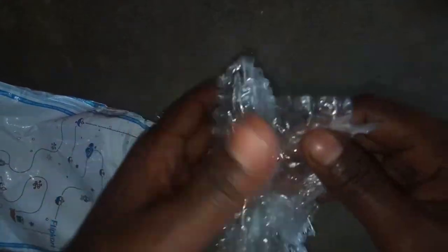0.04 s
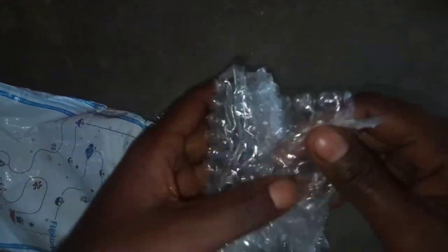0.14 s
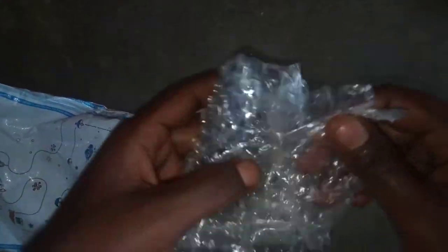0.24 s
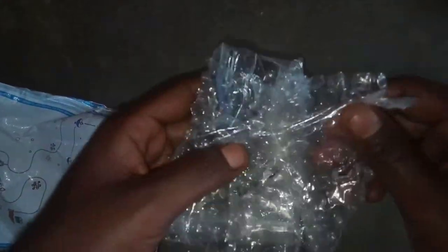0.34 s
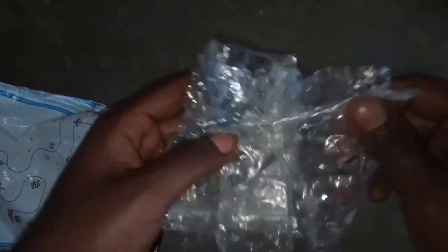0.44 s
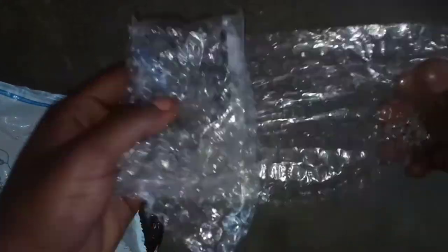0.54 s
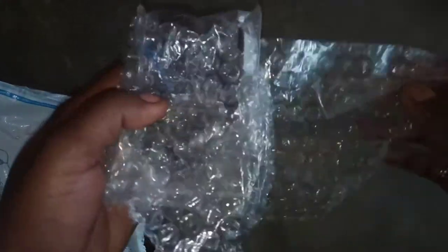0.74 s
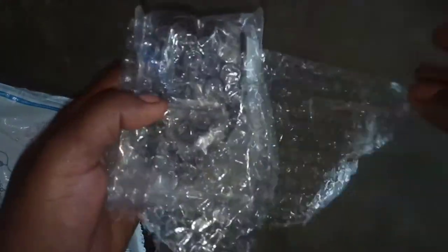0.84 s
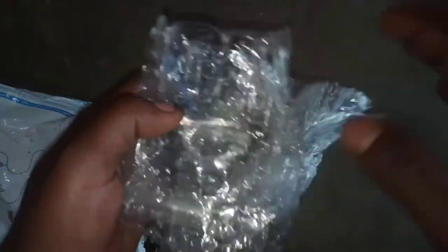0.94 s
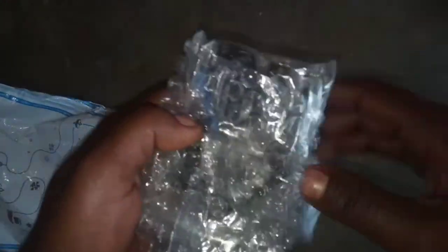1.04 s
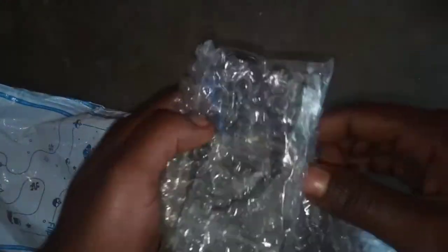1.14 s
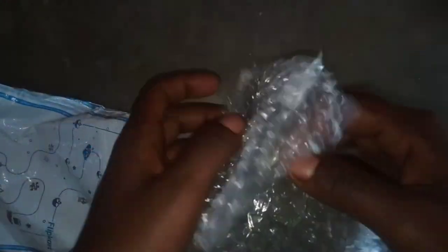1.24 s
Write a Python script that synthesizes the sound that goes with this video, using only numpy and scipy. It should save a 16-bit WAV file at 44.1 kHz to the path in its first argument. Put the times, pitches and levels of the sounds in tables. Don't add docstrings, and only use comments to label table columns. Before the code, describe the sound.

Hands unwrap crinkly plastic film indoors, heard very near. Fine crackle and separate snaps swell into a quick peeling crackle with a dull thud, then fade to sparse, quiet gripping ticks with a short room tail.

```python
import sys
import numpy as np
from scipy import signal
from scipy.io import wavfile
from scipy.ndimage import uniform_filter1d

SR = 44100
rng = np.random.default_rng(int(sys.argv[2]) if len(sys.argv) > 2 else 0)


def waveform_to_disk(signal):
    frames = np.transpose(np.atleast_2d(signal))
    scaled = np.clip(frames, -1, 1) * 32767
    samples = np.round(scaled).astype(np.int16)
    wavfile.write(sys.argv[1], SR, samples)


def to_linear_factor(level_db):
    exponent = np.asarray(level_db, float) / 20
    return 10 ** exponent


N = 57330


def evened(x):
    return x / np.sqrt(np.mean(x ** 2) + 1e-20)


def read(points, hz):
    f, value = np.transpose(points)
    return np.interp(np.log(hz + 1), np.log(f + 1), value)


def colour(x, points):
    log_gain = np.log(to_linear_factor(read(points, abs(np.fft.fftfreq(4096, 1 / SR)))))
    response = np.exp(log_gain - 1j * signal.hilbert(log_gain).imag)
    return signal.oaconvolve(x, np.fft.ifft(response).real[:2048])[:len(x)]


def ring(x, hz, width_hz):
    t = np.arange(700) / SR
    fade = t * np.exp(-np.pi * width_hz * t * 1.6)
    y = np.convolve(x, fade * np.sin(2 * np.pi * hz * t))[:700]
    return y / abs(y).max()


def snap(low_db, low_hz, high_db, high_hz, chance):
    # pitch in Hz, width in Hz, level in dB.
    film_rings = [(3500, 600, -7), (4800, 600, -9), (6200, 600, -8)]
    snap_ms, big_snap_db = 0.4, -19
    u = np.arange(120) / (snap_ms * SR / 1000)
    push = chance[:120] * to_linear_factor(6.6 * chance[120:240]) * u * np.exp(-2 * u)

    belly_db = -4 + 1.3 * min(low_db - big_snap_db, 0)
    belly = to_linear_factor(belly_db) * ring(abs(push), 670, 230)
    low = ring(abs(push), low_hz, 320) - belly

    high = ring(push, high_hz, 520)
    high = high + sum(to_linear_factor(db) * ring(push, hz, width_hz) for hz, width_hz, db in film_rings)
    high = high + to_linear_factor(-2) * ring(chance[:3], 4900, 2600)
    return to_linear_factor(-2) * (to_linear_factor(low_db) * low + to_linear_factor(high_db) * high)


def snaps():
    # time in seconds, low ring peak in dB, low ring in Hz, high ring peak in dB, high ring in Hz.
    turning = [(0.0137, -42.5, 1480, -50, 3820), (0.1187, -52.5, 1900, -59, 3400),
               (0.16, -51, 1620, -52.5, 4380), (0.2089, -46.5, 1600, -47, 3730),
               (0.2197, -42.5, 1500, -43.5, 5200), (0.2486, -21.5, 1510, -29.5, 3320),
               (0.2512, -35.5, 2050, -55, 3500), (0.2359, -51, 1500, -39, 5360),
               (0.2616, -60, 1260, -31.5, 5600), (0.2656, -36, 1570, -41, 5600),
               (0.2737, -34, 1620, -42, 3570), (0.3111, -26.5, 1580, -33.5, 3420),
               (0.3212, -41, 1320, -41, 2970), (0.323, -31, 1640, -46, 4200),
               (0.3246, -48, 1630, -45, 5900), (0.329, -56, 2160.0, -37, 3740.0),
               (0.3308, -61, 1840, -40, 3440), (0.3422, -50, 1400, -42, 3650),
               (0.3499, -33.5, 1500, -37, 3660), (0.3527, -33, 1620, -43, 2818),
               (0.3614, -27.5, 1560, -30.5, 3700), (0.3701, -25, 1626, -32, 3500),
               (0.3735, -38, 1730, -34.5, 3050), (0.4083, -38.5, 720, -36.5, 3060),
               (0.431, -35, 1540, -39, 3140), (0.4505, -43.5, 1270, -40, 3860)]
    peeling = [(0.465, -70, 1240, -46.5, 4150), (0.5117, -68, 1870, -43, 3800),
               (0.5237, -32, 1940, -32.5, 3290), (0.5286, -48, 1170, -37, 3600),
               (0.5352, -32, 654, -43, 3730), (0.5402, -36, 1750, -42, 5400), (0.547, -30, 1100, -33, 4900),
               (0.5513, -28.5, 900, -41, 5430), (0.5539, -36, 1840, -52, 5100),
               (0.5545, -42, 950, -33, 5200), (0.5581, -34, 910, -33, 4600), (0.5603, -43, 1500, -39, 5200),
               (0.5632, -22.5, 870, -37, 3380), (0.5636, -21.5, 1580, -22.5, 4240),
               (0.566, -28.5, 1990, -39, 5900), (0.5676, -25.5, 1740, -37, 5150),
               (0.5709, -46, 1090, -33, 5700), (0.5724, -31, 1860, -31, 6250),
               (0.5728, -30, 746, -45, 3640), (0.5752, -33.5, 1950, -23, 5100),
               (0.576, -35, 1200, -29.5, 6340), (0.5772, -40, 1950, -21.5, 4630),
               (0.58, -29.5, 1150, -27, 4900), (0.5822, -38, 1200, -27.5, 4600),
               (0.5831, -25, 1960, -28.5, 5900), (0.5848, -26.5, 660, -31, 3630),
               (0.586, -37.5, 1150, -22.5, 4430), (0.5875, -22.5, 1530, -37, 5930),
               (0.5901, -29, 1480, -28, 5000), (0.5912, -28, 1130, -23, 4420),
               (0.5936, -32.5, 2000, -34, 3150), (0.5979, -40, 820, -48, 5000),
               (0.6179, -34.5, 1670, -41, 5330), (0.6279, -37, 1770, -52, 4500),
               (0.6381, -28.5, 930, -34, 5060), (0.639, -34, 1690, -34.5, 3390)]
    settling = [(0.6931, -50, 1060, -59, 5580.0), (0.7148, -69, 1020.0, -47, 2970),
                (0.7624, -68, 1340, -47.5, 5300), (0.8614, -67, 1430, -49, 4070),
                (0.8702, -45, 1080, -47.5, 5520), (0.9604, -81, 1820, -57.5, 5300),
                (0.9902, -54, 1900, -53, 3350), (0.9915, -60, 1900, -54, 3200),
                (1.026, -53.5, 880, -75, 2780), (1.0282, -52.5, 1590, -78, 2780),
                (1.0385, -62, 1600, -48, 4960), (1.039, -46, 1590, -47, 6200),
                (1.0705, -50, 1710, -43, 3200), (1.0718, -65, 1700, -48.5, 5800),
                (1.1205, -43.5, 1550, -47.5, 3150), (1.1236, -46, 1570, -44.5, 5420),
                (1.157, -49.5, 1720, -54, 3140), (1.1766, -39.5, 850, -55, 3860),
                (1.188, -43, 1600, -48.5, 3380), (1.2083, -42.5, 1560, -45, 3150),
                (1.2456, -69, 1300, -40.5, 3080), (1.2491, -43, 740, -50, 3470),
                (1.252, -48.5, 1690, -48, 3600), (1.2604, -58, 1890, -68, 3070.0)]
    # start in seconds, peak in dB, pitch in Hz.
    flopping = [
        (0.2487, -44, 333),
        (0.5724, -38.5, 366),
        (0.577, -39, 340),
        (0.5866, -42, 410),
        (0.5955, -41.5, 287),
        (0.6162, -41.5, 414),
        (0.624, -40, 314),
        (0.636, -43.5, 307),
        (0.642, -45.5, 336),
    ]
    # pitch in Hz, level in dB.
    close_film = [(90, -42), (220, -12.5), (2000, 0), (2500, -8), (3200, -3.5), (6600, 0.5), (7400, -7.5),
                  (15000, -28)]
    creases, sheet = np.zeros((2, N + 700))
    rows = turning + peeling + settling
    for (s, *row), chance in zip(rows, rng.standard_normal((len(rows), 250))):
        creases[round((s - .0004) * SR):][:700] += snap(*row, chance)
    for s, db, hz in flopping:
        sheet[round(s * SR):][:700] += to_linear_factor(db) * ring([1.], hz, 145)
    return colour(creases, close_film)[:N] + sheet[:N]


def ticks():
    # start in seconds, level in dB.
    spits = [(0.1602, -68), (0.167, -73), (0.187, -80), (0.2088, -69), (0.22, -58), (0.2363, -59),
             (0.2481, -41.5), (0.2612, -55), (0.2655, -50), (0.273, -47.5), (0.2897, -62), (0.3114, -50),
             (0.323, -53), (0.3249, -51), (0.3287, -51), (0.3319, -47), (0.3424, -59), (0.3501, -50),
             (0.3527, -53), (0.3609, -42.5), (0.3697, -45), (0.3807, -55), (0.391, -56), (0.4014, -57),
             (0.4076, -49), (0.4149, -63), (0.422, -57), (0.4331, -63), (0.4571, -72), (0.4659, -63),
             (0.516, -59), (0.5246, -59), (0.5288, -54), (0.5345, -59), (0.5402, -49), (0.5445, -53),
             (0.547, -48), (0.5512, -49), (0.5554, -50), (0.5583, -40.5), (0.562, -45), (0.5778, -35),
             (0.583, -35), (0.586, -35), (0.591, -40.5), (0.6215, -57), (0.6372, -45), (0.705, -63),
             (0.716, -59), (0.7501, -68), (0.7617, -63), (0.862, -66), (0.9617, -73), (0.991, -68),
             (1.0383, -70), (1.0717, -63.5), (1.1259, -65), (1.154, -65), (1.189, -65), (1.2649, -59)]
    # pitch in Hz, level in dB.
    hiss_tone = [(6500, -19), (8200, 0), (10000, 0), (11800, -4.5), (14500, 0.5)]
    rise_ms = 0.76
    u = np.arange(300) / (rise_ms * SR / 1000)
    gate = np.zeros(N + 300)
    for s, db in spits:
        gate[round(s * SR):][:300] += to_linear_factor(db - 1) * u * np.exp(1 - u)
    return gate[:N] * evened(colour(rng.standard_normal(N), hiss_tone))


def swarm(per_s, low_hz, top_hz, cycles):
    size = to_linear_factor(3 * np.minimum(rng.exponential(1, N), 3))
    size = size * (rng.random(N) < per_s / SR) * rng.choice([-1, 1], N)
    patch = rng.integers(0, 24, N)
    total = np.zeros(N)
    for k, hz in enumerate(np.geomspace(low_hz, top_hz, 24)):
        grain = ring([1.], hz, hz / cycles)
        total += signal.oaconvolve(size * (patch == k), grain / np.linalg.norm(grain))[:N]
    return evened(total)


def crackle():
    # time in seconds, crackle level in dB, fullness of the low part in dB.
    effort = [(0, -61.5, -10), (.13, -71.5, -24), (0.201, -62.5, -5.5), (.225, -57, -7.5),
              (0.258, -48.5, -9.5), (0.292, -58, 1.5), (0.322, -49, -4.5), (.385, -52, -11),
              (0.501, -66, -6), (0.554, -42, -3.5), (0.589, -36, -8), (0.599, -45.5, 0.5),
              (0.683, -56.5, -6), (0.841, -63, -12), (0.941, -78, -10), (1.103, -67.5, -7.5),
              (1.128, -58.5, -4.5), (1.3, -61, -1)]
    # pitch in Hz, level in dB.
    film_tone = [(150, -20.5), (600, -18), (1550, 1), (2600, -4.5), (4600, -2), (6500, -4), (7500, -21),
                 (15000, -32)]
    # pitch in Hz, level in dB.
    sheet_tone = [(60, -50), (150, -31), (300, 0), (700, 10.5), (1200, 7), (2500, -15)]
    s, level_db, full_db = np.transpose(effort)
    t = np.arange(N) / SR
    level_db = np.interp(t, s, level_db)
    full_db = np.interp(t, s, full_db)

    clump_ms, clump_db = 3.5, 2.0
    width = round(clump_ms * SR / 1000)
    clumps = uniform_filter1d(uniform_filter1d(rng.standard_normal(N), width), width)
    level_db = level_db + clump_db * evened(clumps)

    rustle = rng.standard_normal(N)
    film = to_linear_factor(-3) * swarm(2500, 688, 7270, cycles=2.43) + to_linear_factor(-1.5) * rustle
    film = evened(colour(film, film_tone))
    body = swarm(2000, 450, 1500, cycles=1.54) + 0.68 * rustle
    body = evened(colour(body, sheet_tone))
    fizz = swarm(1700, 7300, 20000, cycles=1.24) + .5 * rustle
    fizz = evened(colour(fizz, [(6500, -22), (8500, 2.5), (15000, -2.5)]))
    fizz_db = -13 + 0.48 * (level_db + 43)
    rumble = rng.standard_normal(N)
    rumble = evened(colour(rumble, [(45, -14.0), (110, -3.5), (300, -2), (600, -22.5)]))
    rumble_db = -66 + 1.04 * (level_db + 54.5 + full_db)

    mix = film + to_linear_factor(-2 + full_db) * body + to_linear_factor(fizz_db) * fizz
    return to_linear_factor(rumble_db) * rumble + to_linear_factor(level_db) * mix


def bump():
    start_s, rise_s, thud_hz = .616, .011, 116
    thud_t60_s, boom_t60_s = .055, .34
    t = np.maximum(np.arange(N) / SR - start_s, 0)
    rise = np.clip(t / rise_s, 0, 1)
    late = np.maximum(t - rise_s, 0)
    thud = np.sin(2 * np.pi * thud_hz * t) * to_linear_factor(-60 * late / thud_t60_s)
    boom = evened(colour(rng.standard_normal(N), [(50, -20), (thud_hz, 0), (250, -8), (500, -30)]))
    boom = to_linear_factor(-18.5 - 60 * late / boom_t60_s) * boom
    return to_linear_factor(-37) * rise * (thud + boom)


def room(x):
    # pitch in Hz, time to fall by 60 dB in seconds.
    tail_times = [(100, 0.45), (600, 0.36), (2000, 0.29), (6000, 0.22), (14000, 0.25)]
    # delay in seconds, level in dB.
    first_echoes = [
        (.0042, -17.5),
        (.0081, -31),
    ]
    taps = np.zeros(SR // 2)
    at = np.arange(400, len(taps) - 20, 20)
    taps[at + rng.integers(0, 20, len(at))] = rng.choice([-1., 1.], len(at))
    hz, t, z = signal.stft(taps, SR, nperseg=256)
    fade = to_linear_factor(-60 * t / read(tail_times, hz)[:, None])
    tail = signal.istft(z * fade, SR, nperseg=256)[1]
    tail = to_linear_factor(-14) * tail / np.linalg.norm(tail)
    for s, db in first_echoes:
        tail[round(s * SR)] += to_linear_factor(db)
    return signal.fftconvolve(x, tail)[:N]


def room_tone():
    # pitch in Hz, level in dB.
    quiet_tone = [(25, -20), (70, -1), (400, -7), (900, -16), (1650, -7), (2500, -18.5), (6200, -15),
                  (7600, -40)]
    return to_linear_factor(-76.5) * evened(colour(rng.standard_normal(N), quiet_tone))


def scene():
    film = snaps() + crackle() + ticks()
    tone = room_tone()
    return (film + room(film) + bump() + tone)[None]


def top_cut(x):
    return signal.sosfilt(signal.butter(12, 16480, fs=SR, output="sos"), x)


def record(dry):
    low_pass = signal.firwin(511, 15550, window=("kaiser", 9), fs=SR)
    mix = signal.oaconvolve(dry, low_pass[None], "same")
    return top_cut(mix)


dry = scene()
out = record(dry)
waveform_to_disk(out)
```